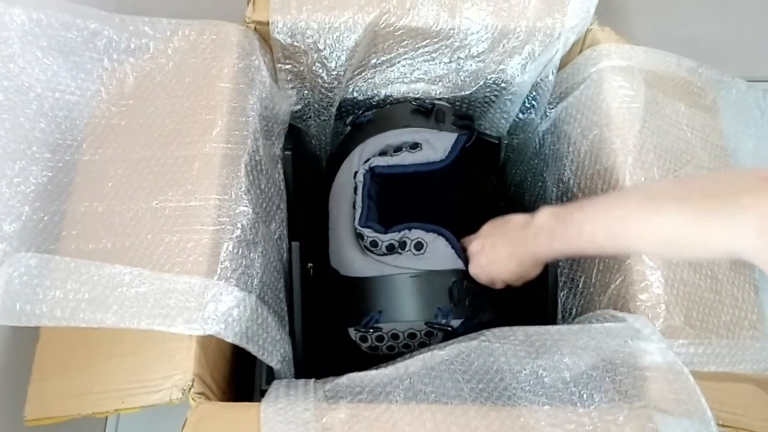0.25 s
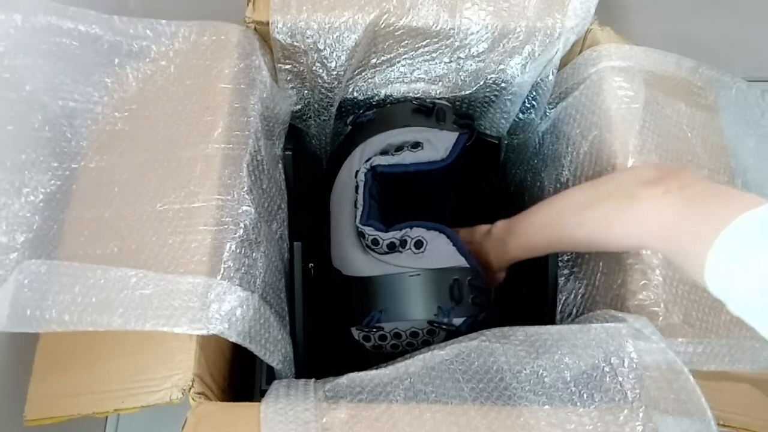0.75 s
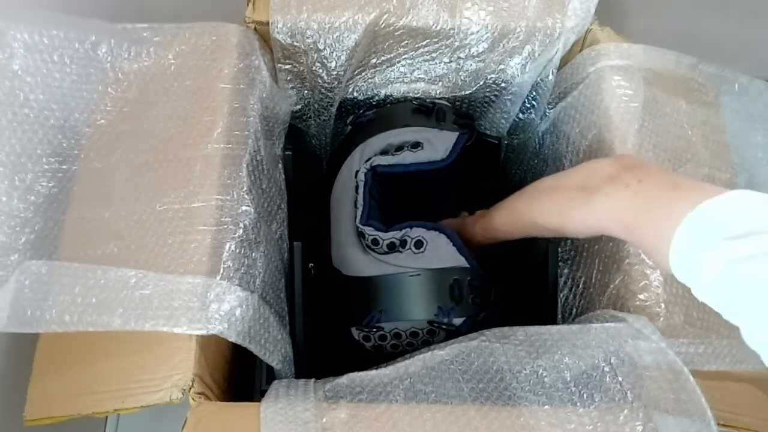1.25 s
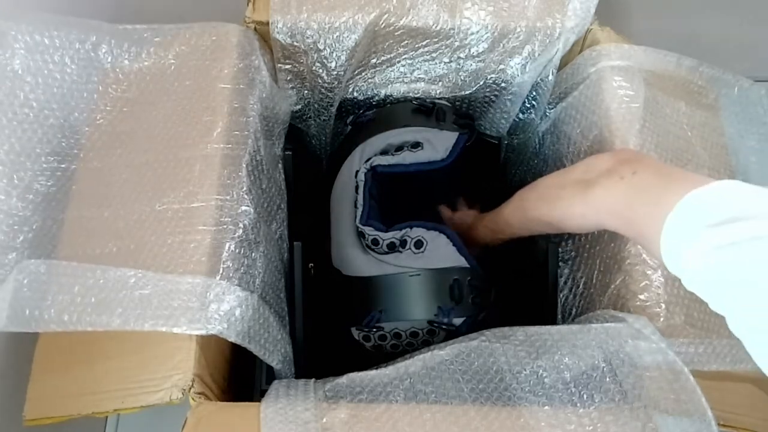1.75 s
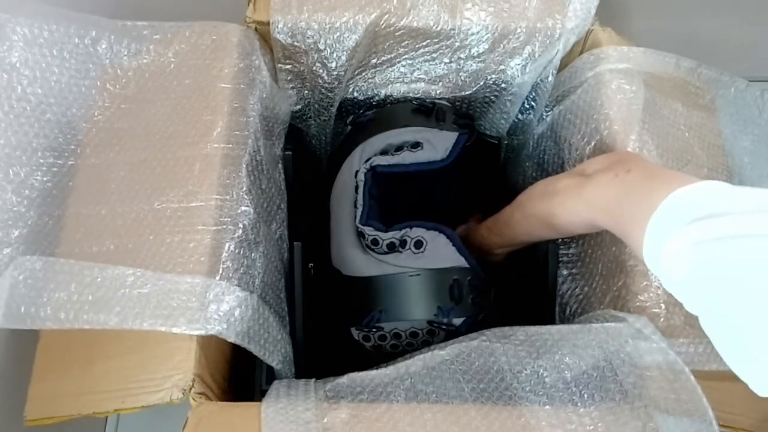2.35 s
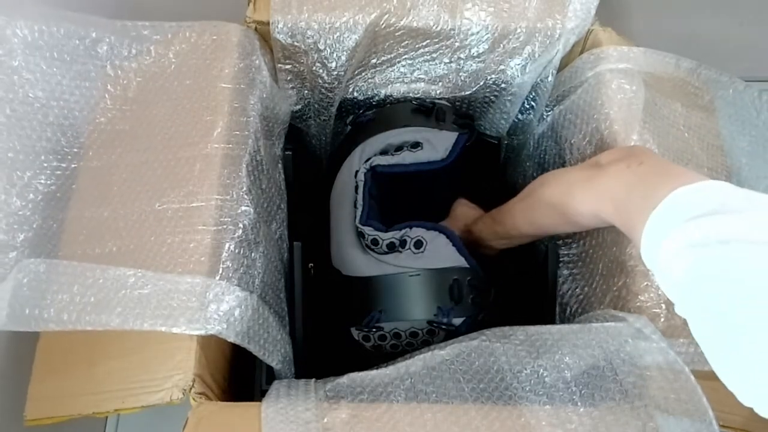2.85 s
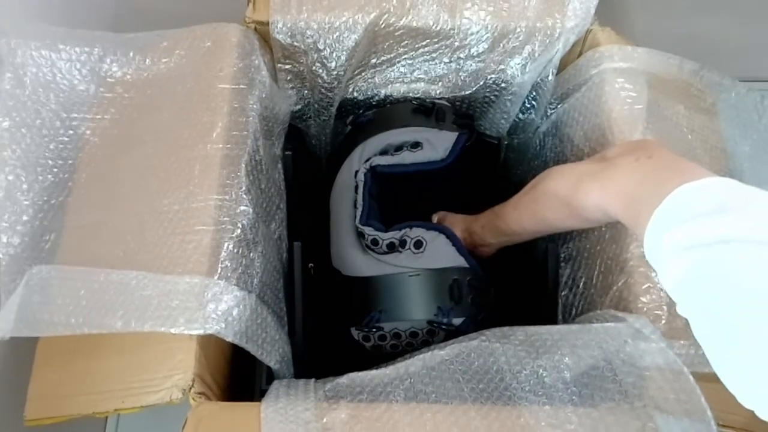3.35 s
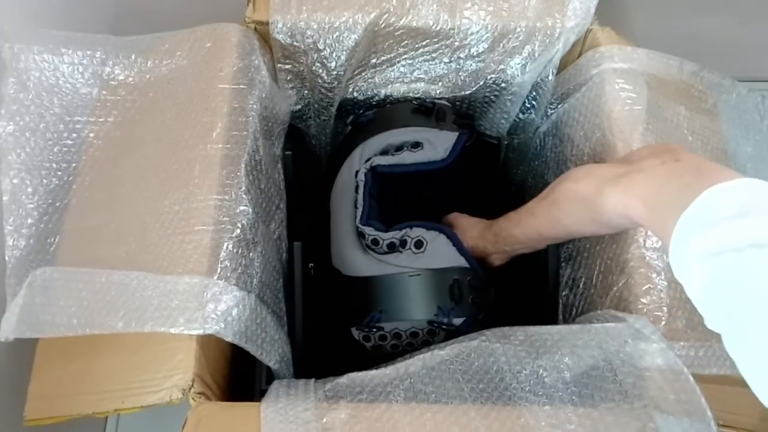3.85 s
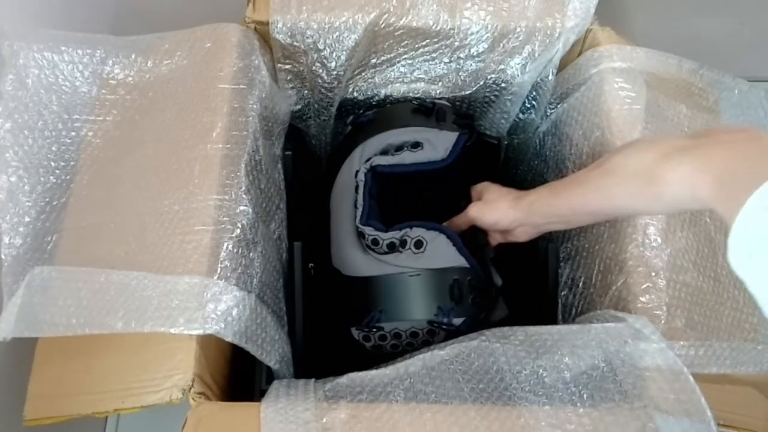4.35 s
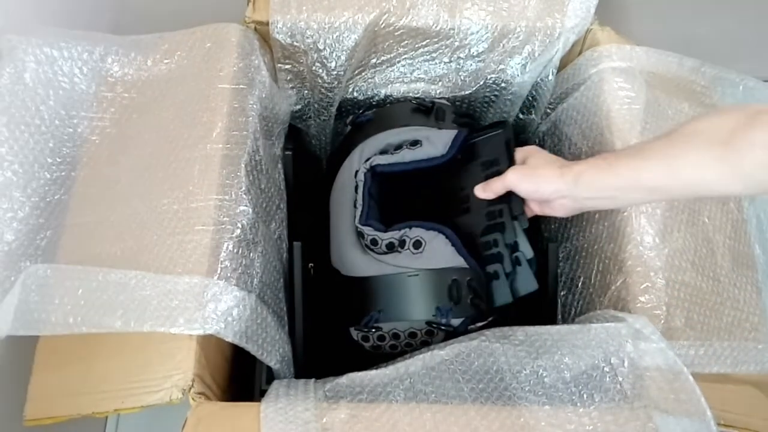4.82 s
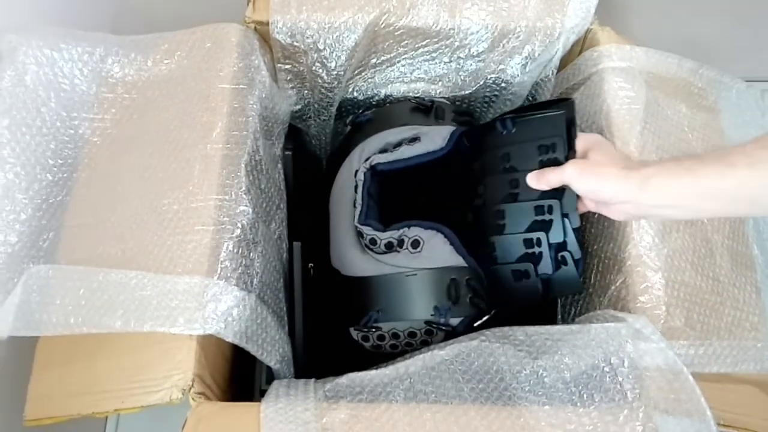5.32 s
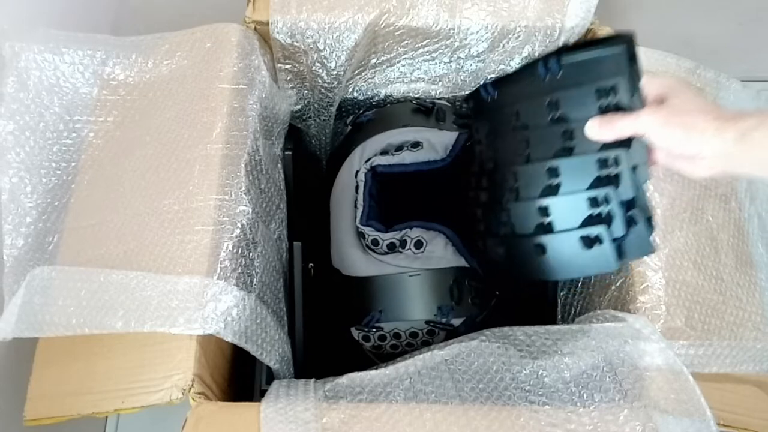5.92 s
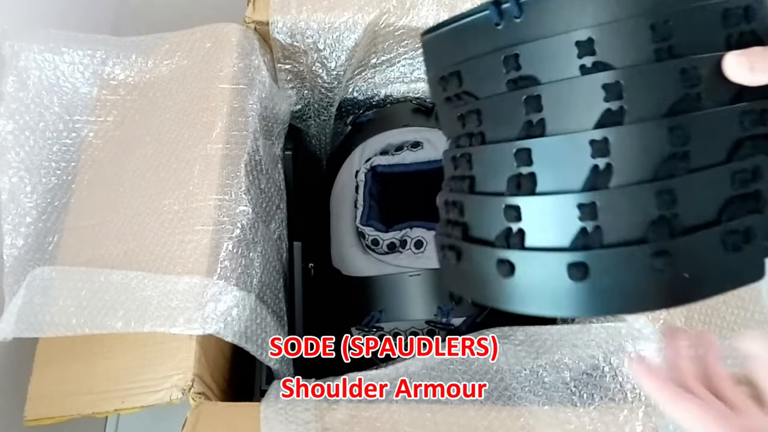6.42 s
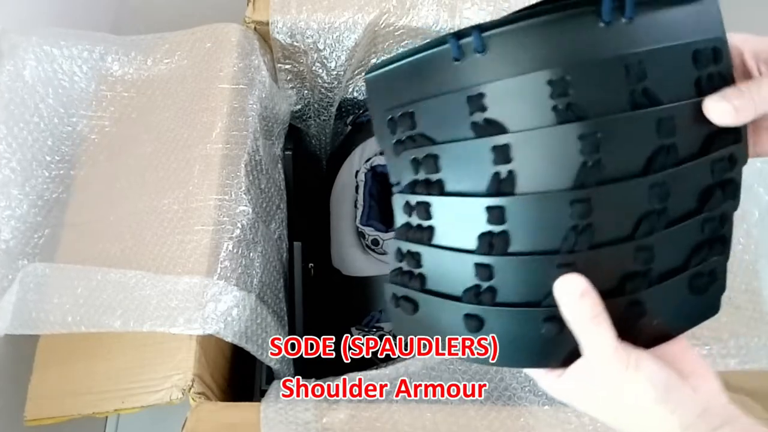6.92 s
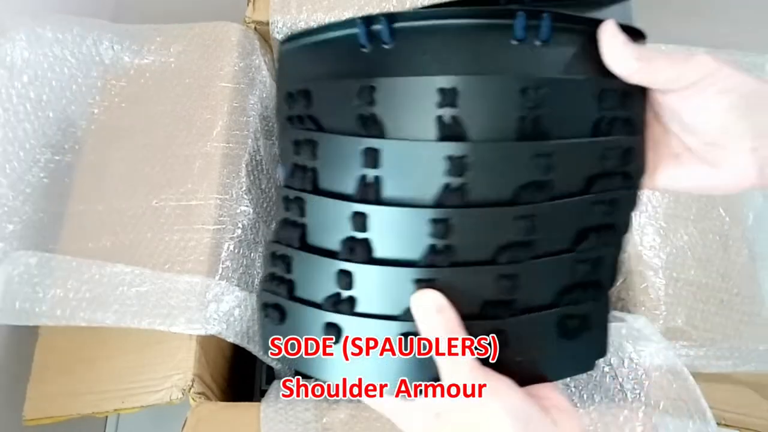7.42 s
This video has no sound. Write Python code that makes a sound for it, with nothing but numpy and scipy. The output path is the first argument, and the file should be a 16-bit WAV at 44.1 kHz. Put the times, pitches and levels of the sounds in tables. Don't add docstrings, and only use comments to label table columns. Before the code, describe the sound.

A brief burst of crisp plastic-film crackle with two hard snaps and low box thumps opens the scene. Then mostly quiet: scattered plate ticks, faint scrapes and muffled cardboard knocks. Later the laced armour plates clack and chatter against one another, with short ringing and rubbing hiss, pause, and clatter again. Close microphone, short room reverberation, low distant hum.

```python
import sys
import numpy as np
from scipy import signal
from scipy.fft import rfft, irfft, next_fast_len
from scipy.io import wavfile
from scipy.ndimage import uniform_filter1d

SR = 44100
rng = np.random.default_rng(int(sys.argv[2]) if len(sys.argv) > 2 else 0)


def transcribe(signal):
    frames = np.atleast_2d(signal).T
    limited = np.clip(frames, -1, 1)
    pcm = np.round(limited * 32767).astype(np.int16)
    wavfile.write(sys.argv[1], SR, pcm)


N = 338247

# frequency in Hz, level in dB, decay time t60 in s.
PLATE_MODES = [(1820, -18, 0.34), (2157, -23, 0.17), (2573, -12, 0.46), (2710, -15.5, 0.17),
               (3250, -8, 0.12), (3300, -16.5, 0.037), (3650, -26, 0.2), (4200, -18, 0.29),
               (4290, -19, 0.31), (5170, -13, 0.72), (4810, -24, 0.33), (5420, -6, 0.085),
               (5590, -3.5, 0.084), (5690, -2, 0.21), (6280, -0.5, 0.72), (6800, -7, 0.11),
               (7900, -31, 0.64), (7920, -5.5, 0.11), (8860, 4.5, 0.044), (10300, 0, 0.054),
               (11340, -17, 0.1), (12540, -28, 0.19)]
# frequency in Hz, density in dB per Hz.
FINE_SPECTRUM = [(4120, -9), (7000, -1), (7960, -8), (10400, -3.5), (13600, -14.5), (14900, -4.5),
                 (15600, -5.5), (16000, -18)]
# start in s, frequency in Hz, level in dB, t60 in s.
LIFTED_RINGS = [(5.242, 3230, -46, .25), (5.241, 2655, -43.5, 0.35), (5.242, 5500, -49, .25),
                (5.242, 2054, -47, 0.23), (5.242, 6480, -48, 0.22), (5.3, 3240, -39, 0.43),
                (5.302, 3610, -39.5, 0.27), (5.302, 2020, -56, .4), (5.304, 2573, -45.5, 0.67),
                (5.302, 4700, -52, 0.27), (5.302, 5500, -57, 0.32), (5.44, 6800, -29, .15),
                (5.502, 2597, -42, 0.48), (5.502, 3200, -50, .25), (5.501, 2218, -44, 0.16),
                (5.501, 4260, -48, 0.41), (5.501, 5500, -43, 0.47), (5.5, 6730, -49, 0.28),
                (6.357, 1870, -51, 0.19), (6.42, 2770, -63.5, 0.48), (6.76, 4850, -67, 0.17),
                (6.788, 1840, -44, 0.29), (6.788, 2207, -45, .27), (6.788, 3268, -42, 0.18),
                (6.8, 4230, -55, 0.36), (6.788, 5383, -42, 0.19), (6.82, 3661, -62, 0.36),
                (6.882, 5233, -44, .25), (6.882, 4264, -48, .21), (6.881, 3250, -47, 0.35),
                (6.882, 5330, -50, .15), (6.99, 4230, -51, 0.5), (6.99, 6380, -49, .4),
                (7.0, 5400, -48, .5), (7.074, 3300, -47, 0.22), (7.08, 2170, -46, .3),
                (7.121, 2580, -61, .25), (7.157, 3300, -50, 0.39), (7.157, 4274, -61, 0.42),
                (7.166, 5440, -50, 0.17), (7.294, 2750, -45, 0.52), (7.293, 3390, -43, 0.28),
                (7.293, 4250, -52, .3), (7.293, 5630, -47, 0.4), (7.293, 6300, -52, 0.25),
                (7.293, 7154, -56, .2), (7.512, 2060, -49.5, 0.28), (7.501, 4290, -44, 0.26),
                (7.512, 5370, -54, .22), (7.501, 6287, -48, 0.24)]


def from_db(db):
    return np.exp(np.asarray(db) * np.float32(np.log(10) / 20))


def rms_one(x):
    return x / np.sqrt(np.mean(x ** 2) + 1e-20)


def at_hz(points, hz):
    point_hz, value = np.array(points)[:, 0], np.array(points)[:, 1]
    return np.interp(np.log(hz), np.log(point_hz), value)


def octave_share(hz, k):
    return np.clip(1 - np.abs(np.log2(hz) - k), 0, 1)


def impulses(times, heights):
    out = np.zeros(N)
    at = np.round(np.asarray(times) * SR).astype(int)
    np.add.at(out, np.minimum(at, N - 1), heights)
    return out


def ring(clicks, hz, t60):
    r = from_db(-60 / (t60 * SR))
    w = 2 * np.pi * hz / SR
    return signal.lfilter([0, np.sin(w)], [1, -2 * r * np.cos(w), r * r], clicks + 1e-18)


def ring_each(times, levels_db, centres_hz, t60s):
    return sum(ring(impulses([s], from_db(db)), hz, t60)
               for s, db, hz, t60 in zip(times, levels_db, centres_hz, t60s))


def fade(clicks, t60):
    return signal.lfilter([1], [1, -from_db(-60 / (t60 * SR))], clicks + 1e-18)


def flicker(depth_db, rate):
    step = 40
    r = np.exp(-2 * step * np.pi * rate / SR)
    noise = rng.standard_normal(N // step + 2002)
    slow = signal.lfilter([1], [1, -2 * r, r * r], noise)[2000:]
    return np.interp(np.arange(N) / step, np.arange(len(slow)), from_db(depth_db * rms_one(slow)))


def coloured(spectrum, patchy_db, rate):
    size = next_fast_len(N)
    hz = np.fft.rfftfreq(size, 1 / SR) + 1
    low_hz, high_hz = spectrum[0][0], spectrum[-1][0]
    inside = np.minimum(1, hz / low_hz) ** 4 * np.minimum(1, high_hz / hz) ** 8
    shaped = rfft(rng.standard_normal(size)) * from_db(at_hz(spectrum, hz)) * inside
    out = np.zeros(N)
    for k in range(int(np.log2(low_hz)), int(np.log2(high_hz)) + 2):
        out += irfft(shaped * octave_share(hz, k), size)[:N] * flicker(patchy_db, rate)
    return rms_one(out)


def through_modes(x, between_db):
    width_hz = 55
    modes = np.array([row[0] for row in PLATE_MODES] + [row[1] for row in LIFTED_RINGS[::3]])
    grid = np.arange(0, SR / 2 + 5, 5)
    peaks = np.max(1 / (1 + ((grid[:, None] - modes) / width_hz) ** 2), axis=1)
    size = next_fast_len(N)
    gain = np.interp(np.fft.rfftfreq(size, 1 / SR), grid, np.maximum(peaks, from_db(between_db)))
    return rms_one(irfft(rfft(x, size) * gain, size)[:N])


def machinery():
    # time in s, low hum in dB.
    load = [(0.0, -41.5), (0.21, -43), (0.34, -48), (0.85, -52), (1.09, -53.5), (1.35, -50.5),
            (2.09, -51.5), (2.6, -53), (3.37, -52.5), (4.04, -49.5), (4.55, -53), (5.28, -50),
            (5.57, -53.5), (6.11, -50), (6.3, -47), (6.71, -53.5), (6.99, -52), (7.67, -52.5)]
    # frequency in Hz, density in dB per Hz.
    rumble_spectrum = [(30, -40.5), (102, -24), (130, -3), (160, -4.5), (195, 2), (249, -6), (332, 1),
                       (414, -0.5), (468, 5), (501, -32.5), (800, -10.5), (1040, -54.5), (1760, -120)]
    # frequency in Hz, density in dB per Hz.
    air_spectrum = [(290, -34), (500, -2.5), (807, -7), (1130, -12.5), (1320, -15.5), (1600, -19.5),
                    (2650, -30), (3390, -32), (3920, -35.5), (16000, -48)]
    # frequency in Hz, width in Hz, level in dB.
    room_tones = [(133.5, 14, -11), (256.1, 14, -7.5), (305.9, 7.2, -10.5), (409.9, 18, -6), (467, 10, -9)]
    hum_db = np.interp(np.arange(N) / SR, *np.transpose(load))
    tones = np.zeros(N)
    for hz, width_hz, level_db in room_tones:
        tone = rms_one(ring(rng.standard_normal(N), hz, 4.1 / width_hz))
        tones += from_db(level_db) * tone * flicker(4, 12.5)
    hum = rms_one(coloured(rumble_spectrum, patchy_db=3.5, rate=4) + tones)
    air_db = -58 + 0.82 * (hum_db - hum_db.mean())
    return from_db(hum_db) * hum + from_db(air_db) * coloured(air_spectrum, patchy_db=2.5, rate=6)


def box():
    # start in s, peak in dB, frequency in Hz.
    thuds = [(0.073, -30.5, 113), (0.022, -36, 146), (0.124, -42, 101), (0.151, -40, 200), (0.24, -42, 300),
             (0.194, -42.5, 112), (1.059, -46, 130), (1.829, -45, 116), (0.325, -32, 115.6),
             (0.37, -41.5, 108), (1.603, -48, 125), (2.666, -41, 137), (3.023, -38, 88), (3.09, -52, 70),
             (5.402, -45.5, 102), (5.43, -46, 77), (5.749, -43.5, 134), (6.902, -46, 87), (6.928, -44, 131)]
    s, peak_db, hz = np.transpose(thuds)
    low = hz < 100
    deep = ring_each(s[low], peak_db[low], hz[low], 6 / hz[low])
    walls = ring_each(s[~low], peak_db[~low], hz[~low], 20.4 / hz[~low])
    walls = signal.sosfilt(signal.butter(2, 85, "high", fs=SR, output="sos"), walls)
    return signal.sosfilt(signal.butter(2, 140, fs=SR, output="sos"), deep + walls)


def brushing():
    # start in s, hold in s, rustle in dB, fine hiss in dB above the rustle.
    brushes = [(0.019, 0.44, -54.5, -3.5), (0.684, 0.077, -60, 1.5), (0.862, 0.035, -64.5, -4),
               (1.6, 0.38, -73, -6), (1.99, 0.037, -67.5, 3.5), (2.104, 0.076, -76, 1.5),
               (2.197, 0.024, -70, 3), (2.502, 0.34, -78.5, -5.5), (3.031, 0.064, -59.5, -3),
               (3.544, 0.38, -81, -8), (3.95, 0.014, -72, -10), (4.436, 0.016, -80.5, -15),
               (4.712, 0.34, -72, -2), (5.422, 0.025, -50, -19), (5.51, 0.36, -68.5, -4),
               (5.97, 0.062, -62, -7), (6.123, 0.5, -76.5, -2), (6.67, 0.14, -68, -7),
               (6.814, 0.25, -60, -8.5), (7.28, 0.086, -62.5, -0.5), (7.583, 0.016, -65, -1)]
    rise_db_per_s, fall_db_per_s = 216.5, 177
    t = np.arange(0, N, 32) / SR
    gains = from_db([[-83.5], [-92]])
    for s, hold, level_db, fine_db in brushes:
        rise_db = -rise_db_per_s * np.maximum(s - t, 0)
        fall_db = -fall_db_per_s * np.maximum(t - s - hold, 0)
        gains = gains + from_db(level_db + rise_db + fall_db + np.array([[0], [fine_db]]))
    return [np.interp(np.arange(N) / SR, t, gain) for gain in gains]


def squeak():
    start_s, end_s, hz, level_db = .283, .365, 15268, -42
    t = np.arange(N) / SR
    held = np.clip(np.minimum(t - start_s, end_s - t) / 0.0037, 0, 1)
    return from_db(level_db) * held * np.sin(2 * np.pi * hz * t)


def wrap():
    # frequency in Hz, density in dB per Hz.
    wrap_spectrum = [(880, -32.5), (1500, -1), (1710, -1), (2240, -9.5), (2530, -4.5), (3500, -4.5),
                     (4600, -5), (5960, 0.5), (8500, -14.5), (11000, -51), (18700, -120)]
    rustle_gain, fine_gain = brushing()
    ticks = (rng.random(N) < 700 / SR) * rng.exponential(1, N)
    grain = rms_one(1 + .2 * fade(ticks, .005))
    rustle = through_modes(coloured(wrap_spectrum, patchy_db=2.5, rate=26), between_db=-4)
    fine = coloured(FINE_SPECTRUM, patchy_db=3, rate=20)
    return grain * (rustle_gain * rustle + fine_gain * fine) + squeak()


def snaps():
    # start in s, peak in dB, centre in Hz, body below 2 kHz in dB.
    snap_events = [
        (0.156, -36.5, 2780, -10.5),
        (0.1813, -27.5, 2820, -15.5),
        (0.264, -31, 4970, -9.5),
        (0.2837, -12, 5200, -32.5),
        (0.3203, -31, 3700, -3.5),
        (0.382, -27.5, 5060, -19.5),
        (0.3888, -8.5, 5150, -22),
        (0.701, -39.5, 5840, -41),
    ]
    # frequency in Hz, density in dB per Hz.
    crinkle_spectrum = [(1180, -25.5), (2000, -9), (2640, -5.5), (3710, -1), (5780, 1.5), (7700, -9.5),
                        (10900, -8.5), (13700, -20.5), (14900, -6), (16000, -13.5)]
    s, peak_db, centre_hz, body_db = np.transpose(snap_events)
    crack = ring_each(s, peak_db - 4, centre_hz, np.full(len(s), 0.009))
    touch = impulses(s, from_db(peak_db))
    crinkle_gain = from_db(-17.5) * fade(touch, 0.025) + from_db(-23.5) * fade(touch, 0.25)
    crinkle = coloured(crinkle_spectrum, patchy_db=1.5, rate=82.0) * crinkle_gain
    puff = coloured([(400, -3.5), (1000, -3), (2200, -2.0)], patchy_db=-3.0, rate=90)
    body = puff * fade(impulses(s, from_db(peak_db + body_db)), 0.22)
    return crack + crinkle + from_db(-6.0) * body


def knocks():
    # start in s, peak in dB, centre in Hz.
    wall_hits = [(1.309, -53, 655), (1.448, -47.5, 467), (1.664, -39, 495), (2.519, -50, 486),
                 (2.59, -42, 790), (2.615, -46.5, 1500), (2.3, -55, 890), (2.335, -52, 1200),
                 (3.092, -43, 467), (5.69, -48, 800), (5.74, -48, 900), (5.79, -49, 650), (1.03, -54, 1100),
                 (1.15, -50, 906), (3.933, -41.5, 467), (4.842, -45.5, 940), (5.419, -48, 1590),
                 (5.436, -36.5, 1140), (6.105, -46, 480), (6.964, -42, 1890)]
    s, peak_db, centre_hz = np.transpose(wall_hits)
    rings = ring_each(s, peak_db + 2.0, centre_hz, np.full(len(s), 0.016))
    touch = uniform_filter1d(impulses(s + .002, from_db(peak_db)), size=200) * 200
    puff = coloured([(450, 1.5), (1000, -7.0), (2200, -17.0)], patchy_db=6.5, rate=34)
    return rings + from_db(-54.0) * puff * fade(touch, 0.24)


def edges():
    # start in s, peak in dB.
    edge_hits = [(1.806, -48), (1.834, -45), (2.5227, -57), (3.5763, -48), (3.6232, -54), (3.702, -37),
                 (3.971, -48.5), (4.809, -55), (4.8408, -24), (4.849, -40), (5.3911, -47), (5.4214, -34),
                 (5.437, -25), (5.5009, -37.5), (6.79, -45), (6.945, -27.5), (6.9594, -29), (7.275, -42),
                 (7.2943, -31.5), (7.3294, -38)]
    s, peak_db = np.transpose(edge_hits)
    touch = impulses(s, from_db(peak_db))
    hiss = coloured(FINE_SPECTRUM, patchy_db=3.5, rate=60)
    return hiss * (from_db(-18.0) * fade(touch, 0.0066) + from_db(-13.5) * fade(touch, 0.095))


def lingering():
    # start in s,
    # frequency in Hz, level in dB, t60 in s.
    faint_rings = [(0.2831, 3660, -21, 0.019), (0.2828, 7100, -18.5, .016), (1.115, 6130, -56, 0.14),
                   (1.115, 4180, -69, .2), (1.178, 5950, -59, .12), (1.18, 7300, -70, .12),
                   (1.198, 6330, -61, .1), (1.198, 10450, -60, 0.1), (1.198, 9200, -70, .08),
                   (1.2, 7200, -65, .1), (1.345, 10150, -68, .15), (1.345, 6700, -61, .06),
                   (1.35, 6080, -47.5, 0.17), (1.352, 3620, -54.5, 0.29), (1.352, 4190, -65, 0.16),
                   (1.666, 2140, -49, 0.13), (1.7, 4188, -45, 0.12), (1.699, 2530, -50, 0.12),
                   (1.74, 4190, -64, 0.26), (1.837, 3370, -63, .35), (1.835, 4199, -57, 0.27),
                   (1.836, 5981, -61, .3), (1.836, 2570, -52, 0.2), (2.391, 2260, -52, 0.33),
                   (2.393, 3235, -50, 0.26), (2.393, 5260, -51, .3), (2.392, 4172, -63, .3),
                   (2.518, 2950, -51, 0.22), (2.592, 2600, -56, .33), (2.591, 3340, -66, 0.26),
                   (2.645, 3750, -61, .15), (3.623, 2610, -53, 0.35), (3.625, 4240, -60, .3),
                   (3.645, 6212, -41, .06), (3.705, 3260, -46, .15), (3.72, 2740, -49, .25),
                   (3.77, 5280, -57, .25), (3.923, 3250, -51, 0.23), (3.93, 2030, -65, 0.24),
                   (4.165, 2600, -72.5, 0.33), (4.25, 5970, -73.5, 0.4), (4.445, 5200, -71, .15),
                   (4.445, 6550, -72, .15), (4.46, 5770, -73, .15), (4.685, 3800, -58, 0.29),
                   (4.71, 5305, -53, 0.17), (4.845, 4670, -44, .3), (4.845, 3930, -40, .3),
                   (5.031, 3280, -61, .25), (5.031, 2680, -57, 0.27)]
    # start in s,
    # frequency in Hz, level in dB, t60 in s.
    stray_rings = [(7.293, 2180, -48, 0.34), (3.768, 3500, -57, .25), (2.519, 3633, -61, 0.22),
                   (2.202, 9700, -59, .04), (4.843, 6400, -40, 0.22), (2.39, 1835, -57, .2)]
    wobble_depth, wobble_step_s, length_s = 1.1, .006, .3
    s, hz, level_db, t60 = np.transpose(faint_rings + LIFTED_RINGS + stray_rings)[:, :, None]
    t = np.arange(round(length_s * SR)) / SR
    steps = np.arange(round(length_s / wobble_step_s) + 2) * wobble_step_s
    wobble = np.array([np.interp(t, steps, row) for row in rng.standard_normal((len(s), len(steps)))])
    swell = np.minimum(1, t / (.035 * t60))
    shape = swell * np.minimum(1, (t[-1] - t) / .05)
    strength = from_db(level_db - 60 * t / t60) * (.6 + wobble_depth * wobble / 2) * shape
    sounds = strength * np.sin(2 * np.pi * hz * t)
    out = np.zeros(N + len(t))
    for at, sound in zip(np.round(s[:, 0] * SR).astype(int), sounds):
        out[at:at + len(t)] += sound
    return out[:N]


def chatter(sound, delays, strengths):
    longest_s, bounce_db = .028, -6
    out = sound.copy()
    lags = (np.abs(np.tanh(delays)) * longest_s * SR).astype(int) + 60
    for lag, strength in zip(lags, strengths):
        out[lag:] += from_db(bounce_db) * np.tanh(strength) * sound[:len(sound) - lag]
    return out


def add_partials(out, s, hz, level_db, t60, phase, bounces):
    at = round(s * SR)
    t = (np.arange(round(.22 * SR)) / SR).astype(np.float32)
    columns = (hz, level_db, t60, phase)
    hz, level_db, t60, phase = (np.reshape(v, (-1, 1)).astype(np.float32) for v in columns)
    turn = np.float32(2 * np.pi)
    beat = 1 + np.float32(.6) * np.cos(turn * (28 + 14 * phase) * t)
    beat = beat + np.float32(.4) * np.sin(turn * (67 - 23 * phase) * t)
    decay = from_db(np.maximum(level_db - 60 * t / t60, -200))
    sound = np.sum(decay * beat * np.sin(turn * (hz * t + phase)), axis=0)
    out[at:at + len(t)] += chatter(sound * np.minimum(1, t / 0.0019), *bounces)[:N - at]


def struck_modes(out, clacks):
    detune, uneven_db, grip_t60_s = .007, 3.5, .14
    mode_hz, mode_db, mode_t60 = np.transpose(PLATE_MODES)
    luck = rng.standard_normal((len(clacks), 4, len(PLATE_MODES)))
    for (s, peak_db, low_hz, treble_db, _), (uneven, grip, damp, phase) in zip(clacks, luck):
        bright_db = np.clip(np.log2(mode_hz / 3300), 0, 1.6) * (treble_db + 3.5)
        level_db = peak_db + mode_db + bright_db - 16.0 + uneven_db * np.clip(uneven, -2, 1)
        t60 = np.minimum(.5 * mode_t60, grip_t60_s) * np.exp(0.17 * np.clip(damp, -2, 1))
        t60 = t60 * np.minimum(1, 5500 / mode_hz)
        add_partials(out, s, mode_hz * (1 + detune * grip), level_db, t60, phase, (grip[:4], damp[:4]))
        high_hz = max(5253, 1.2 * low_hz) * (1 + detune * grip[-1])
        pair_db = [peak_db - 18.0, peak_db + treble_db - 6.5]
        add_partials(out, s, [low_hz, high_hz], pair_db, [.08, .06], phase[:2], (grip[4:8], damp[4:8]))


def loose_modes(out, clacks):
    low_hz, high_hz, loose_db, t60_s = 1900, 7000, -22, .085
    luck = rng.random((len(clacks), 3, 10))
    for (s, peak_db, _, treble_db, _), (place, size, chance) in zip(clacks, luck):
        hz = low_hz * (high_hz / low_hz) ** place
        level_db = peak_db + loose_db + 8 * size + place ** 2 * (treble_db + 4.0)
        bounces = (size[:3], chance[:3] - .5)
        add_partials(out, s, hz, level_db, t60_s * (.5 + chance), chance, bounces)


def accents(out):
    # start in s, frequency in Hz, level in dB, t60 in s.
    accent_partials = [(1.667, 3250, -54, 0.06), (4.445, 4100, -70.5, 0.11), (1.667, 6100, -55, 0.052),
                       (1.834, 6020, -57, 0.035), (1.837, 3320, -48.5, 0.081), (2.399, 2580, -64, 0.16),
                       (2.521, 3400, -61, 0.11), (2.588, 3300, -59, 0.17), (4.842, 5760, -36, 0.16),
                       (3.575, 2589, -52, 0.1), (3.578, 4209, -53, 0.051), (3.98, 3900, -54, 0.056),
                       (6.947, 6310, -37, 0.12), (4.842, 1986, -46, 0.071), (4.842, 3900, -55, 0.15),
                       (5.24, 9460, -50, 0.048), (5.298, 4900, -48, 0.058), (5.438, 4300, -35, 0.08),
                       (5.5, 2570, -35.5, 0.077), (5.5, 3200, -20, 0.011), (5.44, 7080, -42, 0.068),
                       (6.946, 8680, -40.5, 0.056), (6.96, 2070, -58, 0.26), (6.95, 3600, -41, 0.17),
                       (6.8, 3900, -50, 0.11), (7.292, 1814, -48.5, 0.27), (7.501, 2900, -55, 0.097)]
    for s, hz, level_db, t60 in accent_partials:
        add_partials(out, s, hz, level_db, t60, 0, rng.standard_normal((2, 3)))


def slides(clacks):
    # frequency in Hz, density in dB per Hz.
    slide_spectrum = [(350, -21), (600, -5.5), (1260, -4), (1470, -5.5), (1920, -4), (2830, -4.5),
                      (3660, -6.5), (6300, 7), (8500, -10), (11000, -36), (18700, -120)]
    s, peak_db, _, treble_db, slide_db = np.transpose(clacks)
    noise = through_modes(coloured(slide_spectrum, patchy_db=5, rate=150), between_db=-7)
    dull = signal.sosfiltfilt(signal.butter(3, 4500, fs=SR, output="sos"), noise)
    out = np.zeros(N)
    for part, tilt_db in ((dull, 0 * treble_db), (noise - dull, 1.85 * (treble_db + 1.5))):
        hits = impulses(s + 0.00053, from_db(peak_db + slide_db + tilt_db))
        touch = uniform_filter1d(hits, size=120)
        out += part * (from_db(-58) * fade(touch, 0.02) + from_db(-7.0) * fade(touch, 0.14))
    return out


def plates():
    # start in s, peak
    # in dB, low partial in Hz, treble in dB above the peak, slide noise in dB above the peak.
    clack_events = [(1.1182, -69, 4200, 0, -3), (1.2965, -48.5, 4310, -40, -28), (1.345, -61.5, 3600, -6.5, 8),
                    (1.4484, -47.5, 2130, -54, -17), (1.665, -39, 3230, -11.5, -10),
                    (1.699, -40, 4070, -8.5, -29), (1.8341, -32.5, 4260, -10.5, -5.5),
                    (2.3888, -39.5, 3280, -14, 3), (2.518, -46.5, 2900, -18, 0),
                    (2.5894, -42.5, 2550, -42, -24), (3.5748, -45, 2690, 2, -25),
                    (3.6227, -42.5, 2700, -4.5, -9), (3.6494, -54, 2610, -17, -14),
                    (3.6987, -34, 2680, -6, -1.5), (3.709, -42, 3660, -10, -24), (3.767, -38, 2610, -8, -8),
                    (3.923, -45, 3230, -26, -19), (3.9705, -45.5, 3940, -20, 3), (4.685, -56, 3720, -8, -8),
                    (2.61, -51.5, 3300, -40, 4), (4.829, -39, 2700, -9, 3), (4.8432, -21, 3390, -15, -11),
                    (4.8508, -33, 3880, -15, -16), (5.029, -40.5, 3305, -22, -19),
                    (5.24, -35, 3260, -13, -9), (5.3011, -27, 3310, -11, -4), (5.341, -30.5, 3170, -30, -2),
               (5.419, -32.5, 2680, -6, 7), (5.436, -34, 4290, -10, 4), (5.446, -32, 4280, -10, -21),
               (5.5, -26.5, 3265, -9, 0), (5.675, -46, 2770, -14, 3), (6.3564, -39, 2710, -67, -36),
               (6.7643, -44, 1970, -24, 3), (6.786, -28.5, 2560, -26, 4), (6.88, -34, 4300, -6.5, 1.5),
               (6.9463, -22, 4200, -6, -1), (6.963, -18, 3286, -18, -10.5), (6.9698, -21, 2700, -19, -34),
               (6.995, -33, 2560, -5, -2), (7.0735, -35.5, 3370, -20, 5.5), (7.124, -34.5, 2490, -37, -14),
               (7.157, -39, 3350, -25, -1), (7.2763, -38.5, 2190, -8, 3), (7.292, -26.5, 2683, -11.5, -5),
               (7.4994, -35, 2690, -11.5, -16), (7.5093, -34.5, 2780, -17, 1.5),
               (7.6655, -38, 2660, -15, 6.5)]
    clacks = clack_events
    out = np.zeros(N)
    struck_modes(out, clacks)
    loose_modes(out, clacks)
    accents(out)
    return out + slides(clacks)


def room(x):
    # frequency in Hz, decay time t60 in s.
    room_t60 = [(500, 0.26), (3000, 0.33), (8000, 0.23), (15000, 0.21)]
    t = np.arange(round(.6 * SR)) / SR
    hz = np.fft.rfftfreq(len(t), 1 / SR) + 1
    white = rfft(rng.standard_normal(len(t)))
    tail = np.zeros(len(t))
    for k in range(8, 16):
        band = irfft(white * octave_share(hz, k), len(t))
        tail += band * from_db(-60 * t / at_hz(room_t60, 2 ** k))
    tail *= np.clip(t / 0.0046, 0, 1)
    return signal.fftconvolve(x, tail / np.sqrt(np.sum(tail ** 2)))[:N]


def scene():
    struck = plates() + edges() + knocks()
    cracked = snaps()
    wet = room(from_db(-4.0) * struck + from_db(-8) * cracked)
    return (struck + cracked + wet + wrap() + box() + machinery() + lingering())[None]


def low_pass(x):
    return signal.sosfilt(signal.butter(12, 16000, fs=SR, output="sos"), x)


def record(dry):
    heard = dry + from_db(-38.5) * ring(dry, 15250, 0.0045)
    heard = signal.sosfilt(signal.butter(3, 55, "high", fs=SR, output="sos"), heard)
    heard = signal.sosfilt(signal.cheby2(12, 32, 15900, fs=SR, output="sos"), heard)
    heard = .4 * np.tanh(heard / .4)
    return low_pass(heard)


dry = scene()
out = record(dry)
transcribe(out)
```